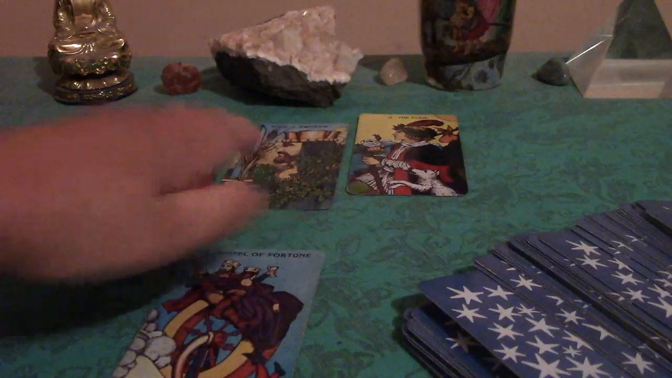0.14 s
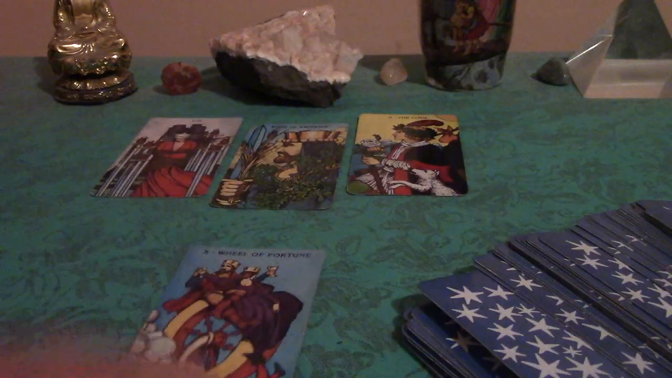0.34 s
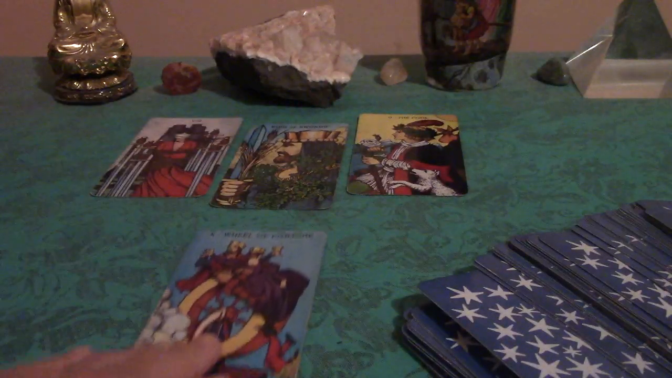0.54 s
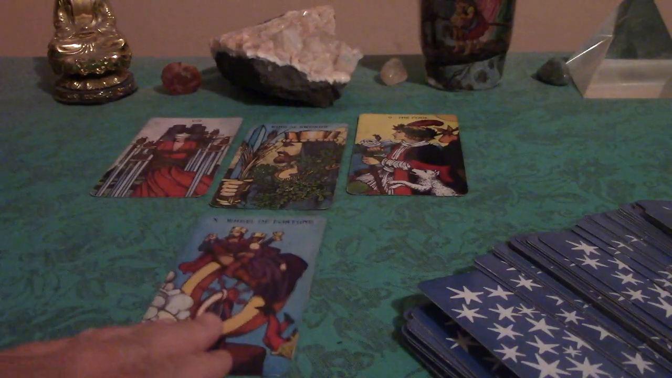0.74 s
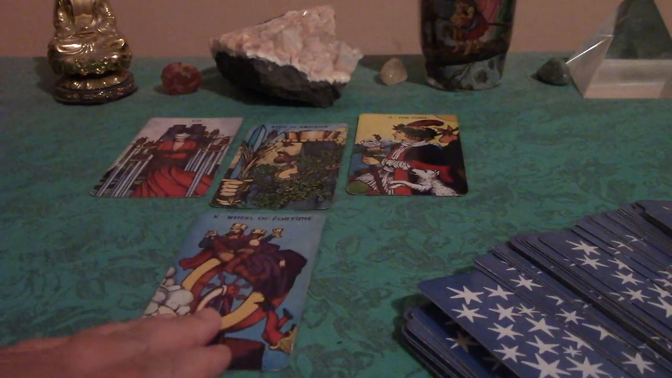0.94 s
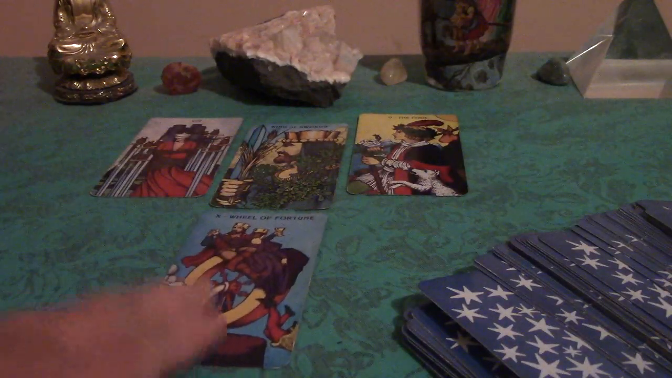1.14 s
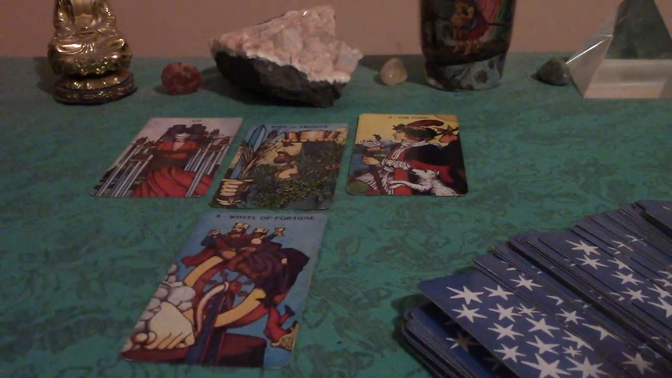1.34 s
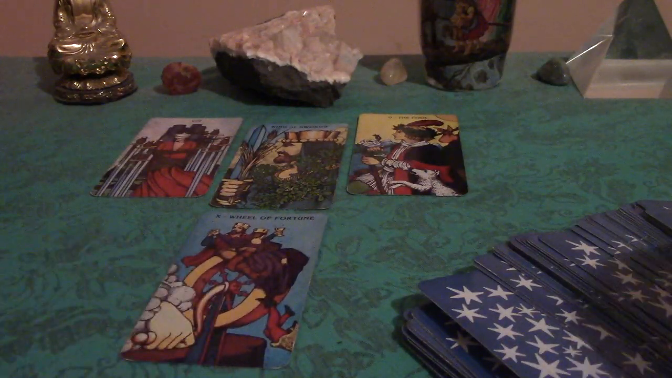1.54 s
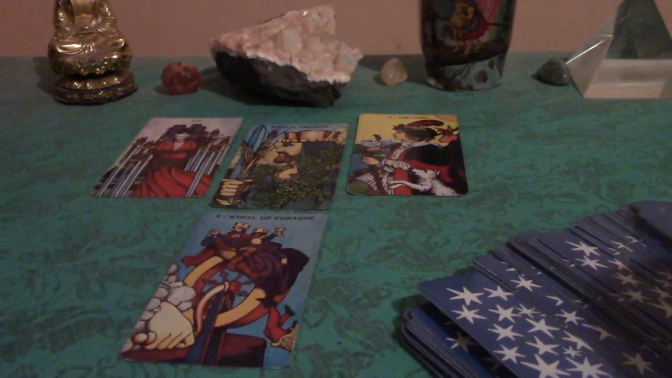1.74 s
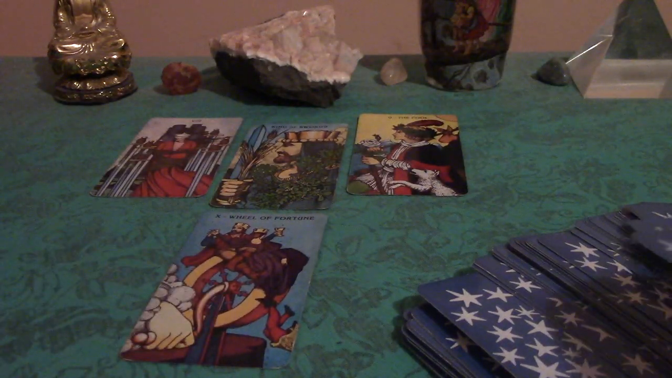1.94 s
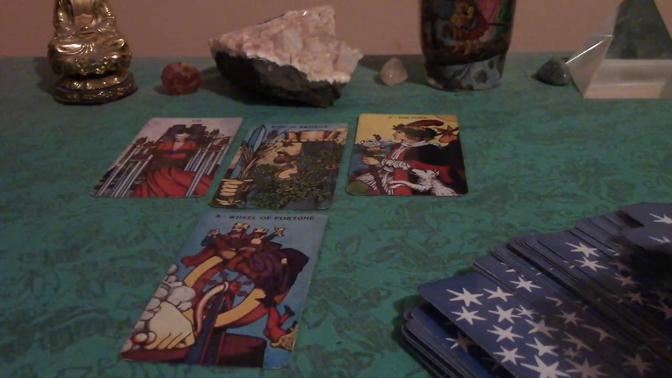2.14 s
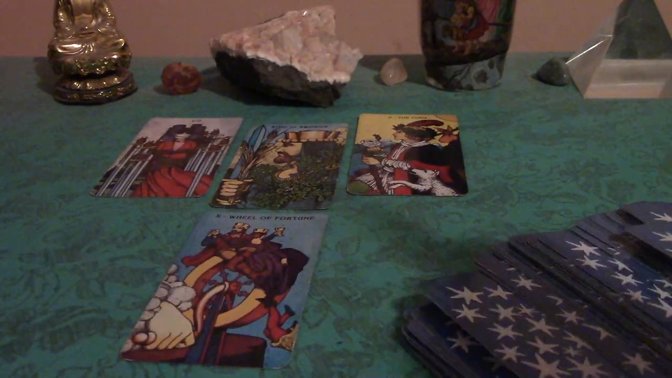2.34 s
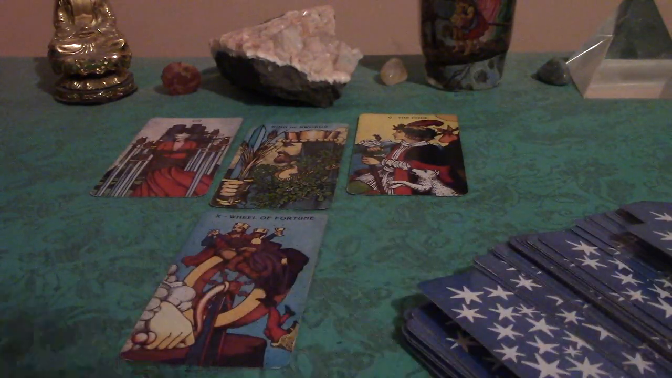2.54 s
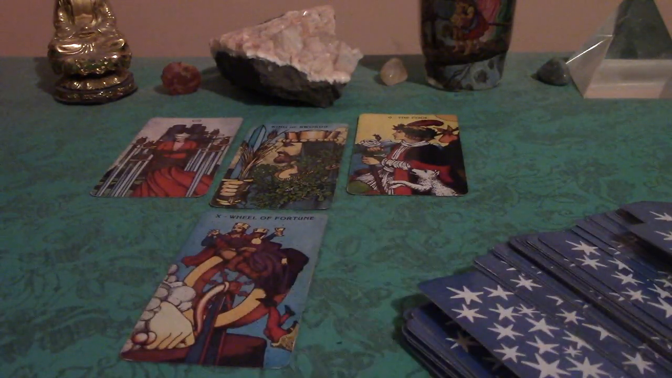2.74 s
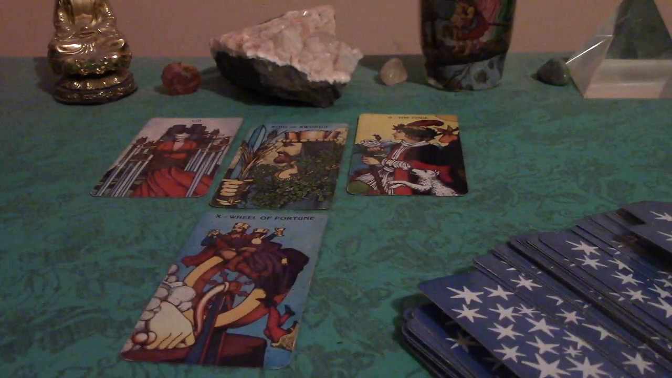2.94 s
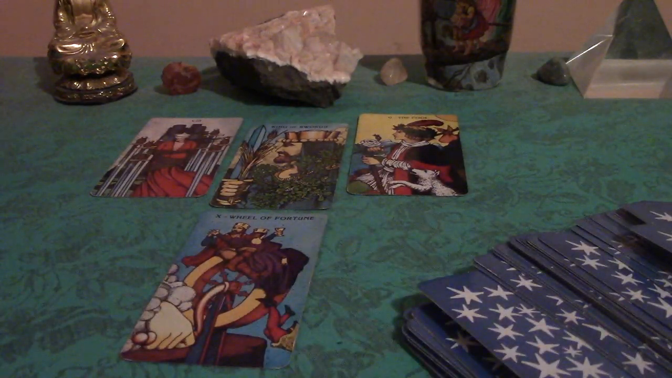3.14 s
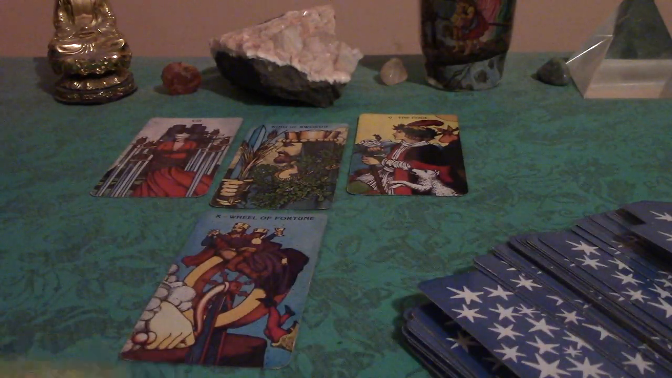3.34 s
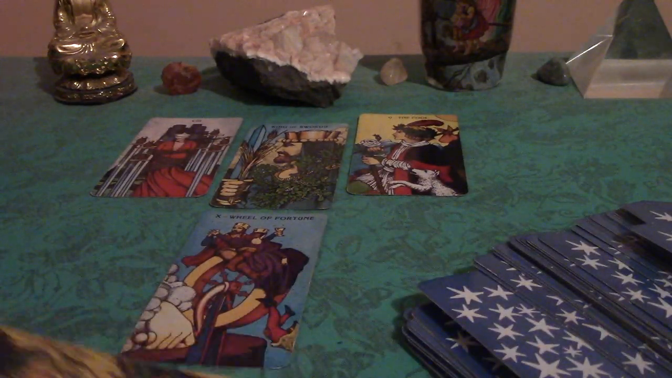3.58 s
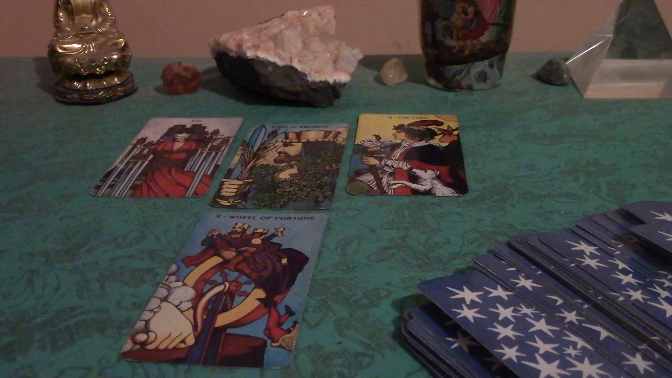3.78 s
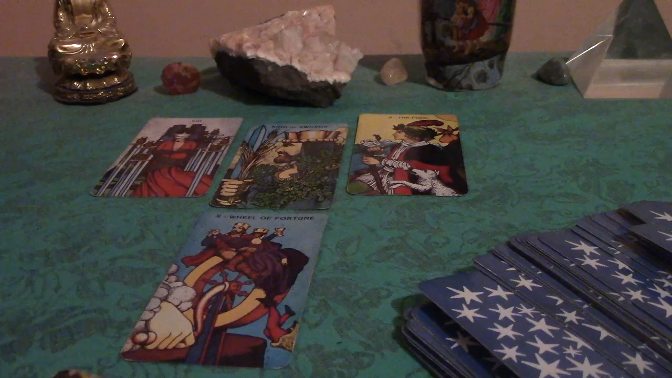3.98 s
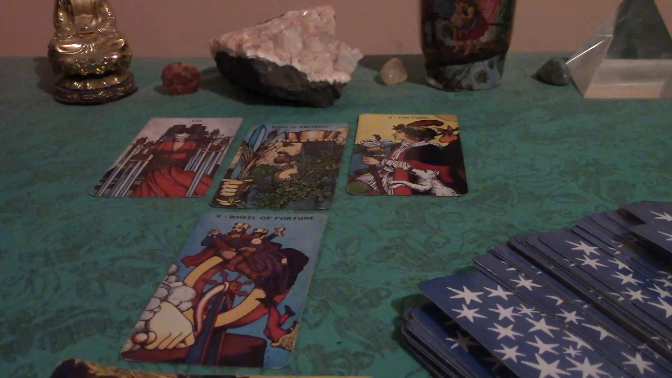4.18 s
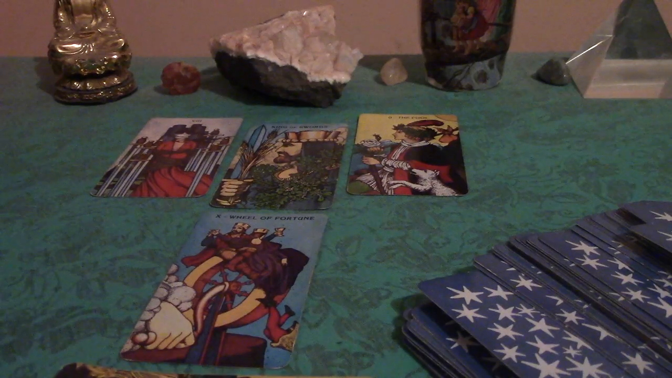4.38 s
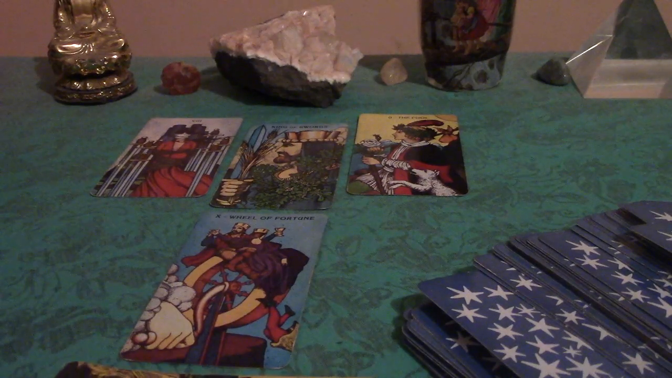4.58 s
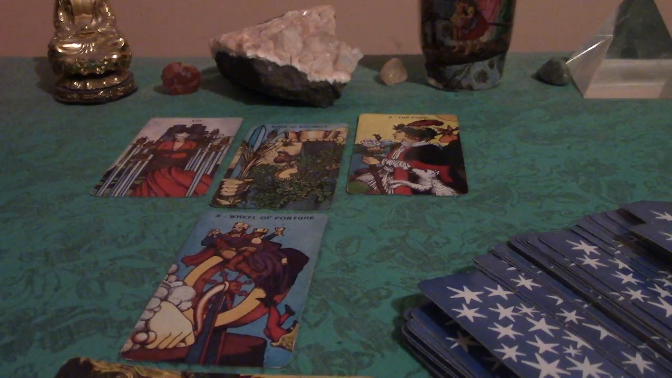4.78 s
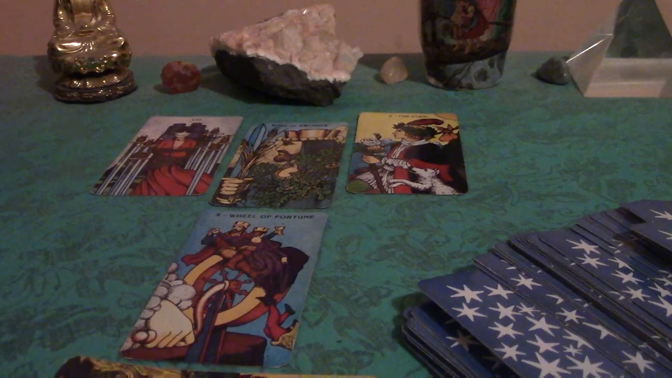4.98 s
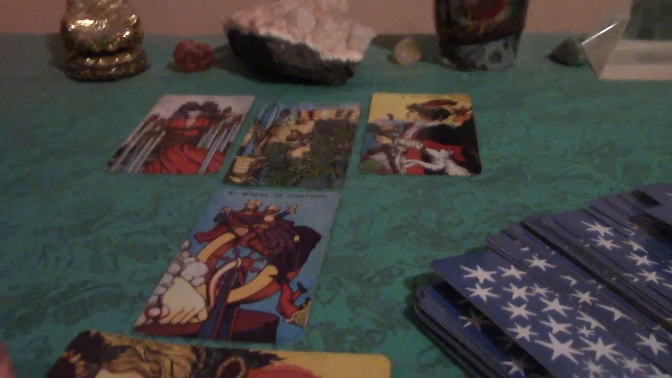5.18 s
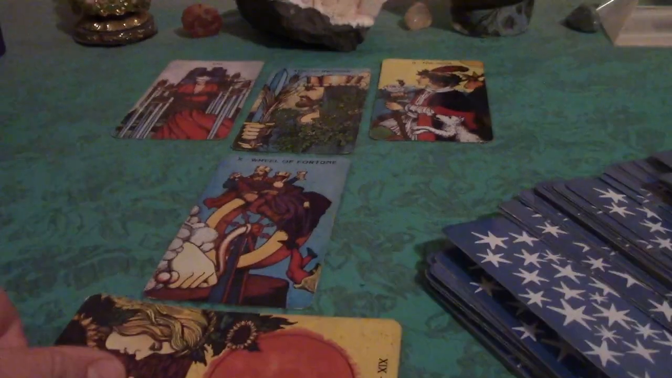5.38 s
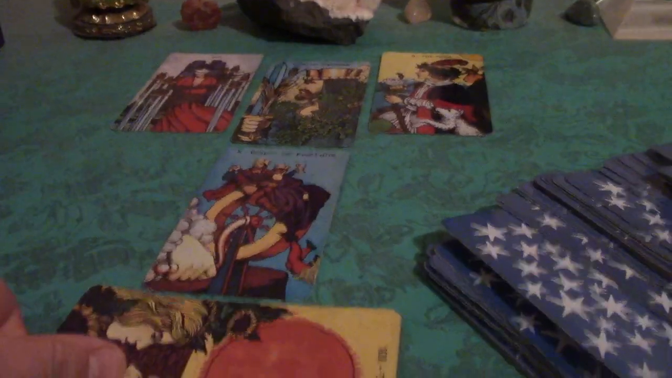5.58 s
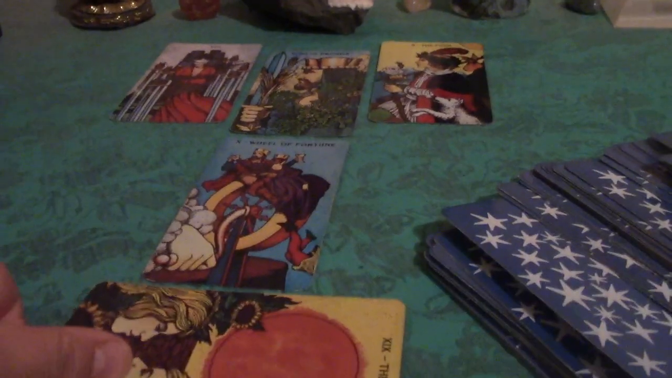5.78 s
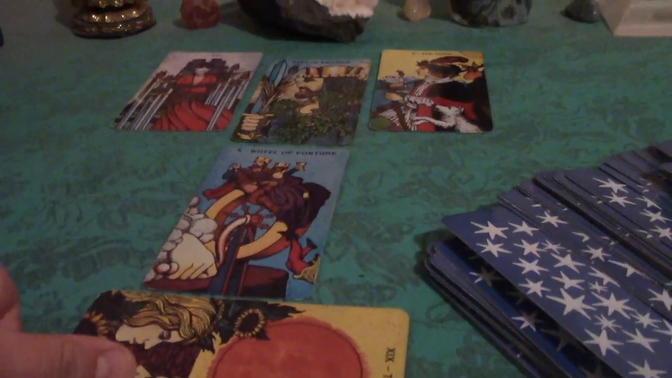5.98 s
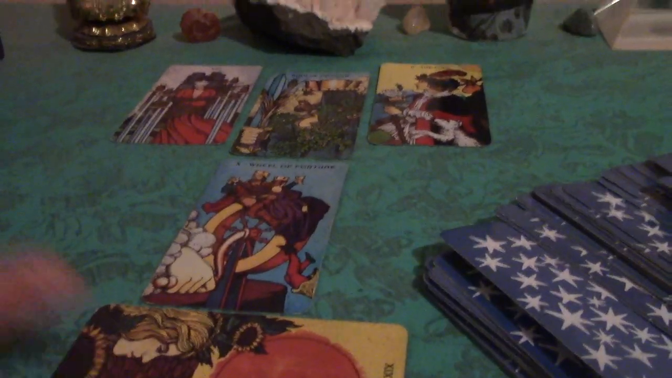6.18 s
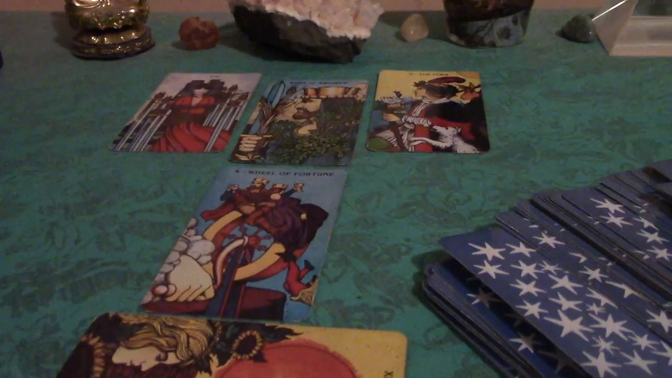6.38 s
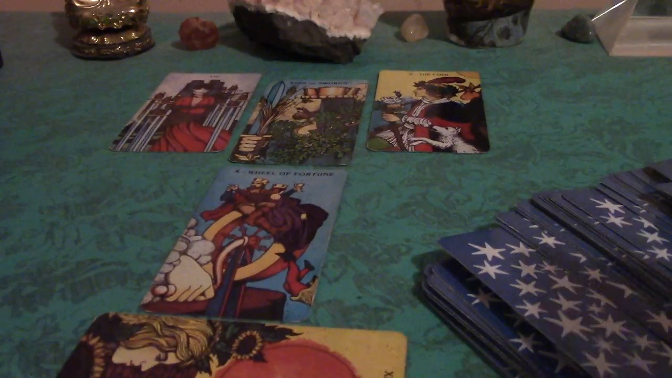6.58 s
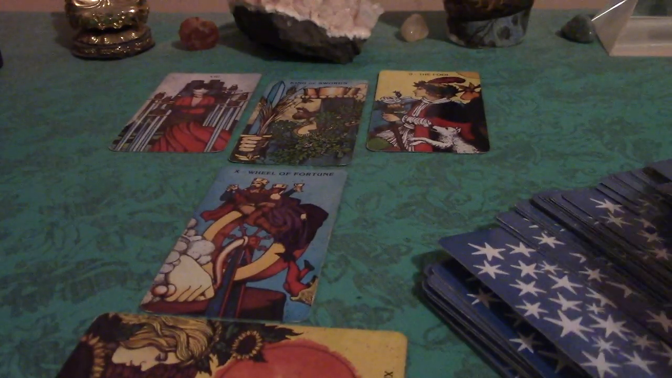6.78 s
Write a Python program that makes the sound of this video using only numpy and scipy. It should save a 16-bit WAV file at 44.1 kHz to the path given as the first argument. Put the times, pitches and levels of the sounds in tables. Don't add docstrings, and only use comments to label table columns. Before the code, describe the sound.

A small, quiet room with faint low rumble and soft air hiss, heard in close stereo. From about 0.35 to 1.1 s a card shuffles across cloth with a thin papery hiss and light taps, followed by tiny dull touches around 1.2 to 1.7 s. A slide speeds up into a sharp, crisp flick at 2.2 s, then dies away. Soft thuds come at 2.7 s, a cluster of taps near 2.9 s and a brief scrape at 3.04 s. At 3.5 s a firm card snap leads into a long slide until 4.2 s. Near quiet follows. From 4.7 s skin rubs plastic; at 5.0 to 5.3 s the mount cracks and pops loudly and densely, far louder than the cards. More cracks come at 5.55 to 5.6 s, with a faint card slide after, then a creaking run at 5.9 to 6.25 s. A brief rub and two soft touches near 6.4 s give way to room quiet.

```python
import sys
import numpy as np
from scipy import signal
from scipy.fft import rfft, irfft, next_fast_len
from scipy.io import wavfile
from scipy.ndimage import uniform_filter1d

SR = 44100
rng = np.random.default_rng(int(sys.argv[2]) if len(sys.argv) > 2 else 0)


def output_pcm(signal):
    pcm = np.clip(np.atleast_2d(signal).T, -1, 1) * 32767
    wavfile.write(sys.argv[1], SR, np.round(pcm).astype(np.int16))


def to_linear_factor(level_db):
    exponent = np.asarray(level_db, float) / 20
    return 10 ** exponent


N = 300762
BURST = 4096

# (time [s], rumble and sleeve level [dB], air level [dB])
ROOM_LEVELS = [(0.0, -61.5, -62.5), (2.28, -60.5, -61), (2.56, -61.5, -62), (3.0, -56.5, -59.5),
               (3.42, -61, -60.5), (3.67, -60, -61), (4.2, -62, -62), (4.75, -58.5, -60),
               (4.94, -59.5, -54.5), (5.07, -57, -52.5), (5.17, -45.5, -47), (5.28, -58, -58.5),
               (5.68, -61.5, -61.5), (5.94, -60, -60.5), (6.1, -48.5, -55), (6.25, -55.5, -57),
               (6.42, -60, -60), (6.82, -61, -61.5)]
# (frequency [Hz], density [dB per Hz])
RUMBLE_TONE = [(15, -53), (25, -23), (54, -20.5), (119, -5), (224, -1), (321, -4.5), (362, -4.5), (422, -2),
               (1160, -14.5), (1500, -12.5), (1950, -55), (3300, -120)]
# (frequency [Hz], density [dB per Hz])
AIR_TONE = [(470, -25.5), (800, -3), (1630, -7.5), (1780, -8), (2660, -10.5), (3800, -13), (13500, -25.5),
            (15500, -34.5), (16500, -38)]
# (frequency [Hz], likeness [0 to 1])
LEFT_RIGHT_LIKENESS = [(60, 0.73), (180, 0.77), (550, 0.63), (1650, 0.69), (4970, 0.76), (15000, 0.88)]
# (time [s], hiss level [dB], card body level [dB], body resonance [Hz])
CARD_SLIDES = [
    [(0.0, -71, -73, 1500), (0.006, -72, -59.5, 1490), (0.022, -69, -82, 1570), (0.15, -84, -82, 1670)],
    [(0.33, -86, -85.5, 3020), (0.354, -65, -63.5, 3170), (0.44, -60, -72.5, 1940),
     (0.598, -59.5, -69.5, 2100), (0.758, -63.5, -82, 1470), (0.812, -70, -87, 1750),
     (0.944, -65.5, -81, 1530), (1.106, -71, -72.5, 2180), (1.14, -86, -82, 1800)],
    [(1.5, -76, -71, 1690), (1.524, -82, -75.5, 1770), (1.728, -77, -71, 1660), (1.732, -64, -66, 1590),
     (1.8, -79, -84, 1680)],
    [(1.95, -76, -76, 1810), (1.978, -73, -73, 1690), (2.124, -55.5, -61.5, 1880), (2.18, -70, -64, 2080)],
    [(2.18, -77, -64.5, 2680), (2.218, -39.5, -42.5, 2540), (2.26, -75, -80, 2390)],
    [(2.26, -64, -67, 1900), (2.27, -63, -64.5, 1880), (2.354, -69, -65.5, 2230), (2.42, -82, -84, 1700)],
    [(2.85, -84, -82.5, 1790), (2.868, -67, -57, 1790), (2.93, -67, -58, 1790)],
    [(2.99, -78, -69, 1840), (3.036, -70, -44.5, 1700), (3.07, -76, -70, 1680)],
    [(3.54, -62, -50, 2050), (3.58, -71, -66, 2040), (3.61, -62, -55, 2110), (3.704, -59.5, -58.5, 2530),
     (3.83, -61.5, -65, 2320), (4.126, -59, -68, 2170), (4.148, -60, -81, 1840), (4.2, -84, -78.5, 1700)],
    [(5.64, -69, -61.5, 2370), (5.692, -64, -74.5, 1960), (5.868, -68.5, -71.5, 1850),
     (5.87, -66, -71, 1870)],
]
# (frequency [Hz], density [dB per Hz])
FIBRE_TONE = [(2060, -26.5), (3500, 0.5), (4600, -3.5), (6050, 4.5), (7850, 3.5), (11100, -7), (12500, -11),
              (13700, -10), (16000, -27)]
# (time [s], card peak [dB], table thud re card [dB], edge tick re card [dB], thud pitch [Hz], contact [ms])
TABLE_TAPS = [(0.3586, -46.5, -11, 6, 423, 3), (0.391, -49.5, -13, 6.5, 374, 2.8),
              (1.0967, -44.5, -17, -1.5, 250, 2.5), (1.1736, -51, 2.5, -24, 427, 2.7),
              (1.1834, -53, 7, -34, 425, 3.4), (1.1964, -47.5, -2, -26, 474, 3),
              (1.2147, -54, -2, -23.5, 450, 2.7), (1.3595, -52, 3, -19, 557, 3.2),
              (1.5445, -56.5, 2, -19, 460, 2.6), (1.664, -47, -14, -7, 619, 2.7),
              (1.737, -48, -20, -12, 560, 2.7), (2.003, -46.5, -10, -0.5, 678, 3),
              (2.17, -47.5, -10, 2.5, 444, 3.5), (2.1844, -43.5, -7, 5, 538, 2.5),
              (2.2251, -29, -24, 0, 622, 2.5), (2.2724, -46, -7.5, 3, 533, 3.2),
              (2.3034, -48.5, 6, -20, 505, 2.6), (2.3256, -39.5, -16, -21, 361, 2.7),
              (2.7226, -43, -5.5, -32, 427, 3), (2.7448, -48, -1.5, -32, 460, 2.8),
              (2.8637, -40, -2, -33, 486, 3.3), (2.8745, -33, -7.5, -24, 452, 3.2),
              (2.8874, -40, -7.5, -27, 700, 3), (2.9046, -46.5, -1.5, -18, 388, 3.3),
              (2.925, -47, -14, -7, 463, 2.7), (2.932, -42, -1.5, -6, 476, 2.4),
              (2.9376, -38.5, -4.5, -7.5, 400, 3.2), (3.4535, -44.5, -5.5, -30, 342, 3.5),
              (3.5201, -35.5, -5, -34.5, 540, 2.7), (3.5248, -25.5, -15, -27, 595, 2.6),
              (3.5342, -39, -15, -16, 748, 3.3), (3.5412, -44, -5, -15, 444, 3.4),
              (4.6855, -42.5, -6, -13.5, 447, 2.9), (4.8295, -40, -7.5, -10, 275, 3.2),
              (6.4173, -50.5, 5, -34.5, 422, 2.8), (6.4345, -48, -1.5, -23.5, 463, 3)]
# (frequency [Hz], width [Hz], level [dB])
CARD_MODES = [(1108, 200, 1), (1800, 390, 0.5), (2705, 700, -2.5)]
# (frequency [Hz], width [Hz], level [dB])
EDGE_MODES = [(4470, 1800, 3.5), (7030, 3000, 6.5), (11000, 4000, -7.5)]
# (time [s], shell level [dB], fizz level [dB])
SKIN_RUBS = [
    [(4.72, -69, -78), (4.748, -51, -51.5), (4.89, -44.5, -60.5), (4.974, -44, -55), (4.996, -41, -67),
     (5.0, -39, -47)],
    [(5.29, -36, -48.5), (5.354, -68.5, -78.5), (5.37, -64.5, -78)],
    [(5.595, -29, -39.5), (5.601, -46.5, -49.5), (5.66, -67.5, -63)],
    [(6.255, -50.5, -51), (6.291, -77.5, -84), (6.321, -38.5, -44.5), (6.36, -80, -77.5)],
]
# (time [s], shell peak [dB], knock re shell [dB], crack re shell [dB], chatter [ms], left-right lean [dB])
MOUNT_SLIPS = [(4.7395, -38, -17.5, -12, 2.9, 3.5), (4.7818, -32.5, -21, -17, 2.5, 2),
               (4.9182, -38, -21, -16, 2.5, -2), (5.0024, -17, -22, -14.5, 2.2, -2.5),
               (5.0085, -20.5, -3.5, -29, 2.3, 3), (5.017, -13.5, -11, -13, 2.3, -1),
               (5.0235, -23, -3, -14, 2.5, -15.5), (5.0315, -6.5, -24, -11.5, 2.7, 0.5),
               (5.0464, -28.5, -16.5, -28, 2.5, 6), (5.0674, -25, -9, -14, 2.4, -1.5),
               (5.0783, -18, -24.5, -9.5, 2.7, 0.5), (5.0944, -50, -17, -28, 2.5, -3),
               (5.1114, -34.5, -13, -14.5, 2.5, 1.5), (5.1351, -17, -25, -13, 2.5, 1.5),
               (5.1411, -22.5, -20, -8.5, 2.7, -7), (5.1657, -20.5, -11, 1.5, 2.9, 3),
               (5.1659, -15.5, -20.5, -2, 2.5, 0.5), (5.1838, -12.5, -20.5, -5, 2.45, -0.5),
               (5.2072, -33, -6, -19, 2.5, 1.5), (5.2197, -16, -16, -9, 2.7, 0),
               (5.2303, -15, -13, -8.5, 2.4, -0.5), (5.2386, -18, -11.5, 0, 2.6, -2.5),
               (5.2658, -20, -4.5, -2, 2.4, 0), (5.2659, -12, -17, -10.5, 2.7, 1.5),
               (5.2833, -18.5, -14, -18, 2.1, -2.5), (5.2912, -23, -16.5, -8, 2.3, 0.5),
               (5.3138, -31, -18.5, -27, 2.2, 0), (5.384, -49.5, -6.5, -28, 2.5, 0),
               (5.3962, -40.5, -12, -33, 2.5, -3), (5.4186, -62, -9.5, -27, 2.5, 2),
               (5.4293, -47.5, -8, -26, 2.5, -3.5), (5.4711, -41.5, -6, -34.5, 3, -14),
               (5.4715, -27.5, -21.5, -41, 2.5, 1.5), (5.5226, -55, 1, 15, 2.1, 2),
               (5.5499, -10, -27.5, -1, 2.6, 0), (5.5645, -5.5, -25.5, -7, 2.4, -1.5),
               (5.5764, -16, -10.5, 0, 2.3, 7.5), (5.5853, -14.5, -15, -5, 2.5, -1),
               (5.5894, -17.5, -11, 0.5, 2.3, -4), (5.904, -16, -25.5, -6, 2.2, 0),
               (5.9234, -16, -13.5, -30.5, 2.2, 1.5), (5.9367, -12.5, -15.5, -19.5, 2.6, -2),
               (5.9556, -12.5, -26.5, 1, 2.3, 1), (5.9949, -14, -20, -3, 2.6, 0.5),
               (6.014, -22.5, -5.5, -13.5, 2.4, -0.5), (6.0331, -16, -19.5, -3, 2.9, -1),
               (6.0841, -14, -20.5, -3.5, 2.9, -1.0), (6.0981, -23, -5, -16.5, 2.1, -0.5),
               (6.113, -11, -20, -16, 2.5, -3), (6.1344, -39.5, -6.5, -30.5, 2.5, -3),
               (6.1485, -37, 5, -7.5, 2.5, -7.5), (6.1528, -16.5, -18.5, -9, 2.4, 2),
               (6.1701, -13.5, -20.5, -7.5, 2.9, 0), (6.2031, -23.5, -14, -22, 2.3, -0.5),
               (6.2113, -41.5, 8.5, -20, 2.9, 4.5), (6.2462, -30, -13.5, -23.5, 2.7, -1.0)]
# (frequency [Hz], width [Hz], level [dB])
SHELL_MODES = [(1128, 290, -1), (1772, 218, 5.5), (2450, 354, 3.5), (3284, 356, -2)]
# (frequency [Hz], width [Hz], level [dB])
KNOCK_MODES = [(161, 97, -11.5), (336, 70, 0), (520, 170, -8), (775, 220, -8)]
# (frequency [Hz], width [Hz], level [dB])
CRACK_MODES = [(3994, 400, -1), (5375, 656, 1), (6200, 700, 0.5), (8320, 1770, -10.5), (13000, 2800, -17.5)]
# (frequency [Hz], time to fall 60 dB [s])
ECHO_TIMES = [(200, 0.22), (2000, 0.17), (10000, 0.059)]


def unit(x):
    return x / np.sqrt(np.mean(x ** 2) + 1e-20)


def along(points, hz):
    f, v = np.transpose(points)
    return np.interp(np.log(hz + 1), np.log(f + 1), v)


def strokes(tables, column, rest=-120):
    t = np.arange(N) / SR
    out = np.full(N, float(rest))
    for rows in tables:
        rows = np.array(rows)
        inside = (t >= rows[0, 0]) & (t < rows[-1, 0])
        out[inside] = np.interp(t[inside], rows[:, 0], rows[:, column])
    return uniform_filter1d(out, size=150)


def modes(table):
    def response(f):
        total = 0
        for k, (centre, width, db) in enumerate(table):
            ring = 1j * f * width / (centre * centre - f * f + 1j * f * width)
            total = total + (-1) ** k * to_linear_factor(db) * ring
        return total
    return response


def filtered(x, response):
    m = next_fast_len(x.shape[-1] + BURST)
    spectrum = rfft(x, m) * response(np.fft.rfftfreq(m, 1 / SR))
    return irfft(spectrum, m)[..., :x.shape[-1]]


def patchy(patchy_db, grit_db):
    z = signal.stft(rng.standard_normal((2, N + BURST)), nperseg=512)[2]
    field = uniform_filter1d(rng.standard_normal(z.shape[1:]), size=6, axis=0)
    field = uniform_filter1d(field, size=10, axis=1)
    pair = signal.istft(z * to_linear_factor(patchy_db * unit(field)), nperseg=512)[1][:, :N]
    bumps = unit(uniform_filter1d(rng.standard_normal(N), size=60))
    return pair * to_linear_factor(grit_db * bumps)


def spread(pair, side_db):
    side = to_linear_factor(side_db) * pair[1]
    return np.array([pair[0] + side, pair[0] - side])


def chatter(ms, rise_ms, spiky_db):
    t = np.arange(BURST) / SR * 1000
    shape = (1 - np.exp(-t / abs(rise_ms))) * np.exp(-(t / max(ms, 0.2)) ** 1.15)
    return shape * rng.standard_normal((2, BURST)) * to_linear_factor(spiky_db * rng.standard_normal(BURST))


def struck(force, table):
    ring = filtered(force, modes(table))
    return ring / np.abs(ring[0]).max()


def add(track, s, sound):
    track[:, round(s * SR):][:, :BURST] += sound


def room_layer(noise, tone):
    def response(hz):
        turn = np.arccos(np.clip(along(LEFT_RIGHT_LIKENESS, hz), -1, 1)) / 2
        return to_linear_factor(along(tone, hz)) * np.array([np.cos(turn), np.sin(turn)])
    return unit(spread(filtered(noise, response), side_db=0))


def room_tone():
    rumble = room_layer(patchy(patchy_db=3.0, grit_db=0.0), RUMBLE_TONE)
    air = room_layer(patchy(patchy_db=0.1, grit_db=-0.5), AIR_TONE)
    rumble_gain = to_linear_factor(strokes([ROOM_LEVELS], column=1, rest=-61) + 1.0)
    air_gain = to_linear_factor(strokes([ROOM_LEVELS], column=2, rest=-65) - 0.5)
    return rumble_gain * rumble + air_gain * air


def slides():
    hiss = unit(filtered(patchy(patchy_db=1.5, grit_db=1), lambda hz: to_linear_factor(along(FIBRE_TONE, hz))))
    octave = np.log2(strokes(CARD_SLIDES, column=3, rest=1950))
    noise = patchy(patchy_db=-1.5, grit_db=2.5)
    body = 0
    for hz in 1300 * 2 ** (np.arange(6) / 3):
        share = np.sqrt(np.clip(1 - 3 * abs(octave - np.log2(hz)), 0, 1))
        body = body + share * unit(filtered(noise, modes([(hz, 0.35 * hz, 0)])))
    hiss = to_linear_factor(strokes(CARD_SLIDES, column=1)) * hiss
    body = to_linear_factor(strokes(CARD_SLIDES, column=2)) * body
    return spread(hiss, side_db=-26) + spread(body, side_db=-32)


def taps():
    out = np.zeros((2, N + BURST))
    for s, db, thud_db, tick_db, hz, ms in TABLE_TAPS:
        card = struck(chatter(ms, rise_ms=0.72, spiky_db=10), CARD_MODES)
        table_modes = [(hz, 170, 0), (190, 100, -9)]  # (Hz, width Hz, dB)
        thud = struck(chatter(1.27 * ms, rise_ms=1.2, spiky_db=2.4), table_modes)
        tick = struck(chatter(0.5 * ms, rise_ms=0.2, spiky_db=10.5), EDGE_MODES)
        contact = card + to_linear_factor(thud_db + 9.5) * thud + to_linear_factor(tick_db + 2.5) * tick
        add(out, s, to_linear_factor(db) * spread(contact, side_db=-33))
    return out[:, :N]


def rubs():
    bright_shell = lambda hz: modes(SHELL_MODES)(hz) * hz / 2000
    shell = unit(filtered(patchy(patchy_db=6, grit_db=1), bright_shell))
    fizz = unit(filtered(patchy(patchy_db=-3, grit_db=2), modes(CRACK_MODES)))
    shell = to_linear_factor(strokes(SKIN_RUBS, column=1)) * shell
    fizz = to_linear_factor(strokes(SKIN_RUBS, column=2)) * fizz
    return spread(shell, side_db=-12) + spread(fizz, side_db=-17)


def slips():
    out = np.zeros((2, N + BURST))
    for s, db, knock_db, crack_db, ms, pan_db in MOUNT_SLIPS:
        shell = spread(struck(chatter(ms, rise_ms=0.45, spiky_db=2.5), SHELL_MODES), side_db=-13.5)
        knock = spread(struck(chatter(1.36 * ms, rise_ms=0.91, spiky_db=0.45), KNOCK_MODES), side_db=-32)
        crack = spread(struck(chatter(0.91 * ms, rise_ms=0.35, spiky_db=8), CRACK_MODES), side_db=-19)
        lean = to_linear_factor([[0.6 * pan_db], [-0.8 * pan_db]])
        slip = lean * shell + to_linear_factor(knock_db + 7.5) * knock + to_linear_factor(crack_db + 6) * crack
        add(out, s, to_linear_factor(db) * slip)
    return out[:, :N]


def walls(x):
    hz, t, z = signal.stft(rng.standard_normal((2, SR // 2)), SR, nperseg=256)
    fade = to_linear_factor(-60 * t / along(ECHO_TIMES, hz)[:, None])
    tail = signal.istft(z * fade, SR, nperseg=256)[1]
    tail = tail / np.linalg.norm(tail[0])
    return signal.fftconvolve(x.mean(0)[None], tail, axes=1)[:, :N]


def scene():
    table = slides() + taps()
    mount = rubs() + slips()
    echo = walls(to_linear_factor(-12) * table + to_linear_factor(-17.5) * mount)
    return room_tone() + table + mount + echo


def roll_off(x):
    return signal.sosfilt(signal.butter(12, 16980, fs=SR, output="sos"), x)


def record(dry):
    return roll_off(dry)


dry = scene()
out = record(dry)
output_pcm(out)
```